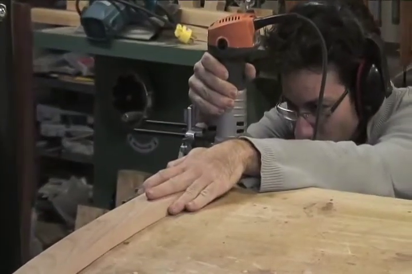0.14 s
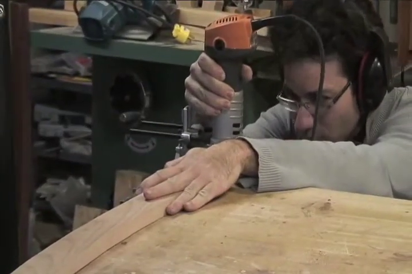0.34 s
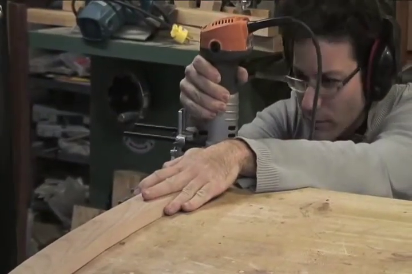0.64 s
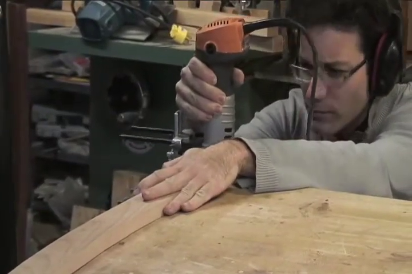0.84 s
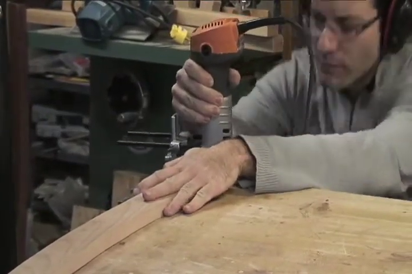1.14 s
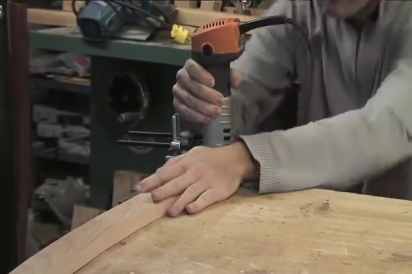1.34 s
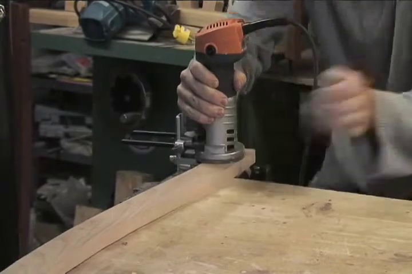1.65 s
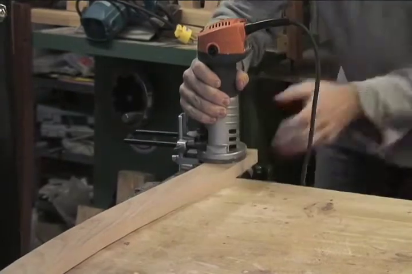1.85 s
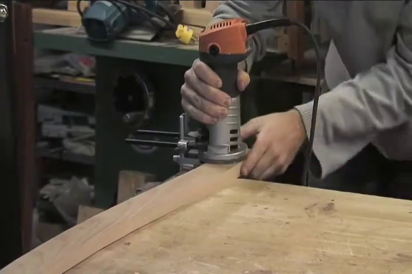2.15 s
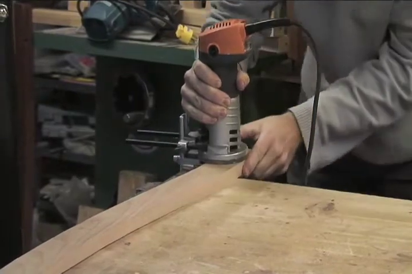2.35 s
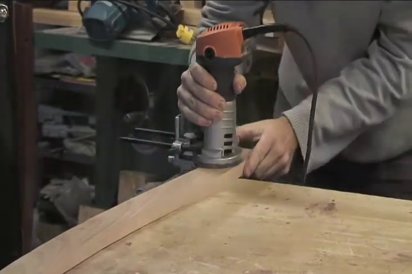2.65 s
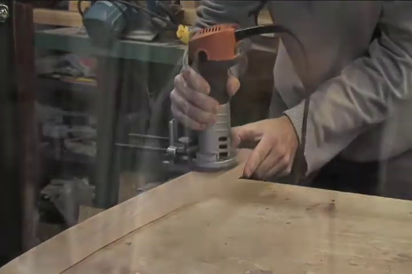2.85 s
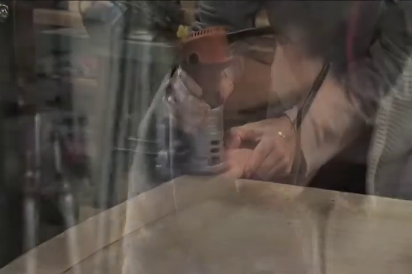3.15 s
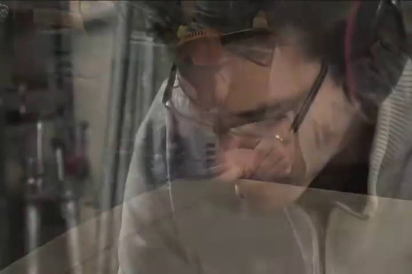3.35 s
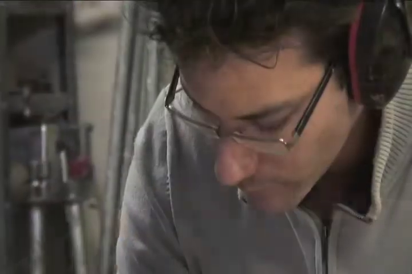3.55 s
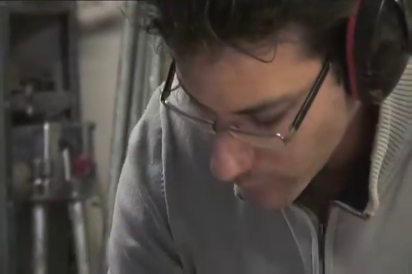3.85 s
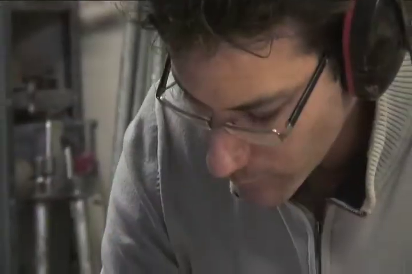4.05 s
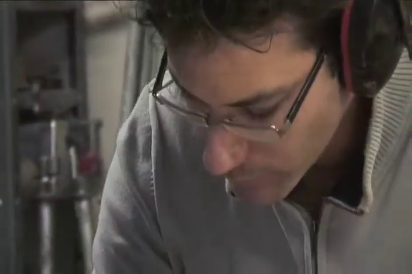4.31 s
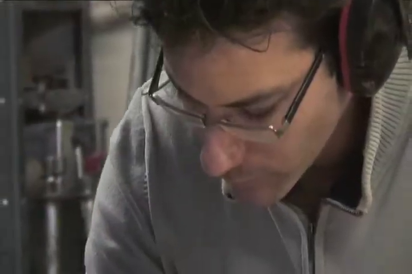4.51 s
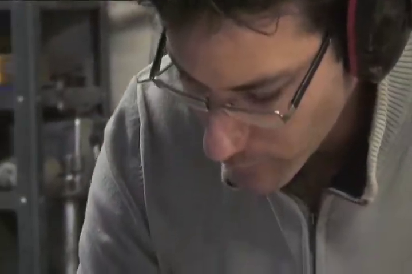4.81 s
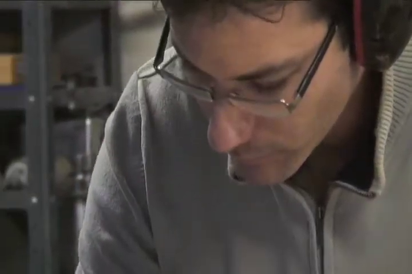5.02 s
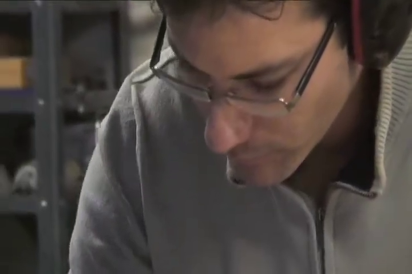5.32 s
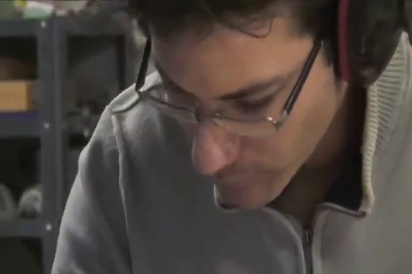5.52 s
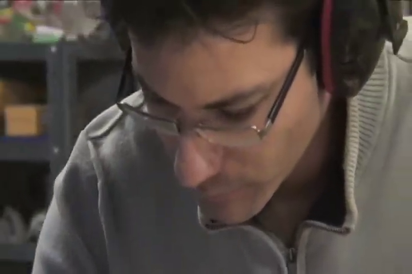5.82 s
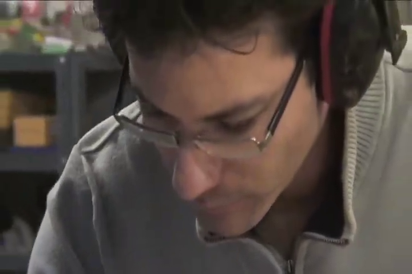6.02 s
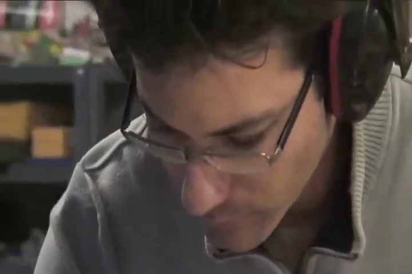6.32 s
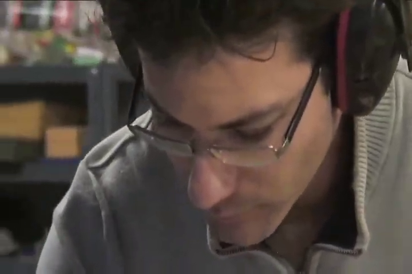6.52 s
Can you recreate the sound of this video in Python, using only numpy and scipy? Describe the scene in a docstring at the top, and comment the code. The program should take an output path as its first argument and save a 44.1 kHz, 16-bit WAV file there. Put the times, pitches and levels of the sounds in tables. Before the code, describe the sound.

A small, fast electric router motor whines continuously, with slightly fluttering overtones and a rush of cooling air. It starts in a light cut, then after a small tick and sudden pitch change it works harder: speed drops a touch, the buzz thickens and the hiss of flying chips rises. Close mono pickup in a workshop, no pauses, still running at the end.

```python
"""The whine of a handheld router in a workshop, at about 29 000 rpm: sines on multiples of its shaft speed.
Behind it, shaped noise gives the rush of cooling air and chips, partly ringing in the housing,
and two sines give a faint motor hum. At 3.14 s the pitch jumps with a faint tick; then the bit bites deeper,
the speed sags and the cutter's orders and the hiss grow. One microphone feeds both channels."""
import sys
import numpy as np
from scipy import signal
from scipy.io import wavfile
from scipy.ndimage import uniform_filter1d

SR = 44100
rng = np.random.default_rng(int(sys.argv[2]) if len(sys.argv) > 2 else 0)


def gain_from_db(level_db):
    """Turn a decibel level (scalar or array-like) into a linear amplitude factor."""
    decades = np.asarray(level_db, float) / 20
    return 10 ** decades


def log_audio(samples):
    """Write samples as a 16-bit WAV file to the path given in sys.argv[1]."""
    # one column per channel
    frames = np.atleast_2d(samples).T
    # limit to full scale, then quantise
    limited = np.clip(frames, -1, 1)
    pcm = np.round(limited * 32767).astype(np.int16)
    wavfile.write(sys.argv[1], SR, pcm)


N = 294147  # samples, 6.67 s
JUMP_S = 3.1435  # pitch and phase jump at once
GRIP_S = 4.84  # the hands shift and damp the housing elsewhere

# Magnetic hum of the motor at twice the mains.
# Each row: time in seconds, level at 120 Hz in dB, level at 240 Hz in dB.
MOTOR_HUM = [(0, -90, -86), (1.1, -76, -88), (1.2, -77.5, -72.5), (2.4, -73.5, -79), (2.6, -77, -91),
             (3.4, -98, -86), (3.9, -70, -91), (5.5, -72, -78), (6.4, -74, -78), (6.67, -89, -87)]

# Spectrum of the cooling air, and how the hiss of chips lifts it.
# Each row: frequency in Hz, relative density in a light cut in dB per Hz, extra in a deep cut in dB.
AIR_SPECTRUM = [(30, -43, 1), (90, -26, -1), (224, -30, 7.5), (380, -12.5, -1), (633, -9.5, 6), (890, 1, 4),
                (2180, 0, -0.1), (2960, -4.5, 3), (4530, -3.5, 3.5), (5220, -9.5, 4.5), (6100, -6, 3),
                (7740, -12.5, 3), (9700, -13, 7), (10500, -17.5, 7), (11270, -14.5, 7.5), (12500, -22, 7),
                (15500, -26.5, 4)]

# Broad modes of the plastic housing and base plate.
# Each row: frequency in Hz, width in Hz, relative level in dB, change in dB once the grip shifts.
HOUSING_MODES = [(727, 79, -7, -28), (825.3, 49, 4, 8), (1087, 47, 2, 6), (1190, 65, -12.5, -7),
                 (1258, 95, 0, 7), (1820, 100, -24, .1), (1898, 73, -4, 13), (4260, 690, -13.5, 15)]

# How hard the tool works.
# Each row: time in seconds, depth of cut 0-1, unsteadiness of the feed 0-1, housing ring in dB.
CUT_LOAD = [(0, 0, 0.1, -37.5), (.6, 0.06, 0.22, -36.5), (1.2, 0.05, 0, -39), (1.75, 0.19, 0, -38),
            (2.3, 0.24, 0.2, -36), (2.7, 0.22, 0.7, -35), (3.14, 0.17, 0.4, -34.5), (3.2, 0.46, .25, -38.5),
            (3.35, 0.87, .3, -37), (3.7, 0.91, 0.07, -39), (4.5, 0.95, .08, -39), (4.9, .8, 0, -44),
            (5.6, 0.95, 0.2, -50.5), (6.0, .9, 0.08, -50), (6.35, 0.85, 0.11, -61), (6.45, 0.48, 0.03, -61),
            (6.67, 0.35, 0.06, -58)]

# The spindle before its hunting is added.
# Each row: time in seconds, shaft speed in Hz, level of the once-a-turn unbalance tone in dB.
SHAFT_SPEED = [(0, 481.2, -38.5), (.22, 480.5, -38), (.36, 481, -38.5), (.8, 484, -38), (1.1, 482.5, -40.5),
               (1.45, 484.2, -39), (1.75, 484.4, -43.5), (2, 486.3, -41.5), (2.28, 484.7, -41.5),
               (2.42, 482.5, -46), (2.72, 480.7, -44.5), (2.88, 486, -44.5), (3.02, 484.3, -42),
               (3.143, 481, -50), (3.145, 487.7, -45), (3.2, 487.8, -44), (3.29, 480.3, -46),
               (3.36, 473.9, -38), (3.5, 471, -30.5), (3.78, 464.6, -31.5), (3.98, 466.9, -28.5),
               (4.28, 467, -25.5), (4.5, 463.3, -28), (4.7, 464.4, -27.5), (4.95, 468.6, -28),
               (5.18, 474, -29.5), (5.4, 473.3, -28), (5.72, 469, -30.5), (5.86, 470.7, -32),
               (6.06, 466.5, -31), (6.2, 468.4, -31), (6.3, 465.8, -30.5), (6.42, 468.7, -31),
               (6.67, 481.6, -34.5)]

# The main orders: two flutes give 2, fan blades 7, commutator 14.
# Each row: order as a multiple of shaft speed, base level in a light cut in dB, in a deep cut in dB.
MAIN_ORDERS = [(2, -51.5, -29), (3, -37, -45), (4, -47, -30.5), (5, -58, -38), (6, -58, -30), (7, -36, -50),
               (8, -58, -38.5), (9, -59.5, -39), (10, -59.5, -38.5), (11, -51.5, -49.5), (12, -54, -42.5),
               (13, -58, -45.5), (14, -49, -44.5)]

# Single orders swell or fade for a moment as the tool moves among its reflections.
# Each row: centre in seconds, order, length in seconds, change at the centre in dB.
ORDER_SWELLS = [(0.04, 2, 0.19, 8.5), (0.05, 6, 0.13, 16), (0.06, 14, 0.27, 10.5), (0.07, 8, 0.17, 16),
                (0.078, 10, 0.18, 11), (0.09, 4, 0.55, 17.5), (0.15, 3, 0.2, 2), (0.155, 4, 0.13, -11.5),
                (0.17, 7, 0.67, -4.5), (0.24, 5, 1.7, 13.0), (0.255, 3, 0.33, 6), (0.394, 2, 1.43, 18),
                (0.487, 14, 0.14, 7), (0.686, 7, 0.16, -6.5), (0.78, 5, 0.15, -14.0),
                (0.96, 11, 0.44, -10.5), (1.03, 3, 0.99, -11), (1.03, 4, 0.73, -3), (1.111, 7, 0.21, -12.5),
                (1.152, 14, 0.18, -11), (1.23, 6, 0.14, 13), (1.4, 11, 1.1, 6), (1.56, 4, 0.17, -3),
                (1.66, 14, 0.27, -14), (1.81, 7, 0.4, -8), (1.89, 3, 0.2, 6.5), (1.93, 12, 0.88, 4.5),
                (2.047, 6, 0.17, 7.5), (2.06, 9, 0.17, 8), (2.18, 4, 0.15, -14), (2.284, 7, 0.25, -6),
                (2.32, 11, 0.62, 7), (2.342, 14, 0.13, -9.5), (2.377, 6, 0.26, 7), (2.407, 2, 0.16, 6),
                (2.45, 9, 0.21, 19.5), (2.53, 3, 0.17, -21), (2.681, 12, 0.78, -3), (2.75, 8, 0.49, -1),
                (2.76, 7, 0.094, -14), (2.92, 2, 0.43, 6), (3.0, 3, 0.25, 2), (3.1, 7, 0.34, -14.5),
                (3.184, 3, 0.13, -13), (3.18, 9, 0.1, 11), (3.186, 5, 0.1, 13), (3.185, 14, 0.091, 9),
                (3.204, 7, 0.4, 17.5), (3.245, 10, 0.13, 5), (3.28, 3, 0.058, 2.5), (3.3, 8, 0.05, 10),
                (3.327, 2, 0.076, -8), (3.334, 12, 0.12, -18), (3.355, 4, 0.24, -8.5), (3.39, 4, 0.67, 10),
                (3.4, 7, 0.088, -10), (3.466, 2, 0.27, 6.5), (3.56, 14, 0.31, 9), (3.57, 5, 0.23, -9),
                (3.61, 3, 1.07, 15), (3.76, 7, 0.49, 9), (3.798, 6, 0.31, 6.5), (3.99, 12, 0.57, 14),
                (4.1, 12, 0.29, -27), (4.12, 10, 0.37, 7), (4.31, 4, 0.22, -10), (4.379, 5, 0.1, -10),
                (4.39, 14, 1.046, 12.5), (4.487, 3, 0.96, 11), (4.585, 14, 0.24, -14),
                (4.774, 7, 0.16, 9.5), (4.778, 9, 0.076, -16.0), (4.826, 5, 0.12, -12.5),
                (4.85, 2, 0.13, -11), (4.942, 4, 0.046, -5), (4.966, 14, 0.3, 4.5), (4.988, 8, 0.21, 4.5),
                (5.12, 2, 0.41, 2), (5.135, 4, 0.088, -11), (5.16, 10, 0.45, -7.5), (5.19, 11, 0.35, -13),
                (5.27, 3, 0.5, 6.5), (5.274, 6, 0.34, -14), (5.48, 11, 1.25, 7), (5.55, 12, 0.17, -10),
                (5.574, 8, 0.55, 5.5), (5.65, 9, 0.44, 4.5), (5.704, 7, 0.4, 12.5), (5.72, 6, 0.2, -6.5),
                (5.75, 2, 0.26, -14), (5.793, 5, 0.13, -21), (5.79, 10, 0.17, -17), (5.835, 14, 0.1, 13),
                (5.85, 4, 0.38, 16.5), (5.977, 6, 0.067, 6.5), (6.017, 4, 0.62, -13.5),
                (6.084, 9, 0.16, -8), (6.099, 6, 0.13, -0.5), (6.13, 12, 0.18, -4), (6.27, 6, 0.14, 3),
                (6.293, 7, 0.5, 11.5), (6.45, 2, 0.14, 9.5), (6.46, 8, 0.16, 8.5), (6.472, 10, 0.29, 10.5),
                (6.496, 3, 0.099, 6.0), (6.51, 13, 0.23, 7), (6.554, 14, 0.32, 11), (6.67, 6, 0.67, 16.5)]

# The faint top orders, which fade in and out by chance.
# Each row: order, base level in a light cut in dB, base level in a deep cut in dB.
TOP_ORDERS = [(15, -60, -57), (16, -60, -54), (17, -61, -54), (18, -61, -54), (19, -66, -57),
              (20, -63, -58), (21, -62, -57), (22, -69, -62), (23, -61, -61), (24, -63, -60),
              (25, -63, -61), (26, -68, -70), (27, -69, -66), (28, -70, -70), (29, -72, -72),
              (30, -74, -74), (31, -74, -75)]


def evened(x):
    """Scales a signal to rms 1."""
    return x / np.sqrt(np.mean(abs(x) ** 2) + 1e-20)


def curves(rows, t):
    """Reads every column of a table at the times t, gliding in straight lines between rows."""
    s, *columns = np.transpose(rows)
    return [np.interp(t, s, c) for c in columns]


def drift(rate_hz):
    """Slow complex chance of rms 1: low-passed noise changing about rate_hz times a second."""
    step, settle = 32, 1998  # samples per point; points dropped while the filter settles
    points = N // step + 2000
    noise = rng.standard_normal(points) + 1j * rng.standard_normal(points)
    b, a = signal.butter(2, rate_hz, fs=SR / step)
    slow = evened(signal.lfilter(b, a, noise)[settle:])
    return np.interp(np.arange(N) / step, np.arange(len(slow)), slow)


def hum():
    """The field coils pull twice in each mains cycle: a tone at 120 Hz and its octave."""
    t = np.arange(N) / SR
    low_db, high_db = curves(MOTOR_HUM, t)
    low = gain_from_db(low_db) * np.sin(2 * np.pi * 120 * t)
    high = gain_from_db(high_db) * np.sin(2 * np.pi * 240 * t)
    return np.sqrt(2) * (low + high)


def tick():
    """A faint tick at the pitch jump: one smooth pulse under a millisecond wide."""
    t = np.arange(N) / SR
    return gain_from_db(-51) * np.exp(-.5 * ((t - JUMP_S) / 0.00036) ** 2)


def air_spectrum(hz, depth):
    """Turbulent cooling air and flying chips: noise amplitude per bin and frame, rising with the cut."""
    f, light_db, extra_db = np.transpose(AIR_SPECTRUM)
    light_db = np.interp(np.log(hz + 1), np.log(f), light_db)[:, None]
    extra_db = np.interp(np.log(hz + 1), np.log(f), extra_db)[:, None]
    air = gain_from_db(light_db + extra_db * depth - 35.5)
    return air / np.sqrt(np.mean(gain_from_db(light_db) ** 2))


def housing_power(hz, t, ring_db):
    """The housing resonates in broad modes, whose balance changes as the grip shifts."""
    shifted = np.clip((t - GRIP_S) / .2, 0, 1)
    ring = 0
    for f, width_hz, db, change_db in HOUSING_MODES:
        peak = 1 / (1 + (2 * (hz[:, None] - f) / width_hz) ** 2) ** 2
        ring = ring + gain_from_db(2 * (db + change_db * shifted)) * peak
    return ring / ring[:, 0].mean() * gain_from_db(2 * ring_db)


def rush():
    """Air, chips and housing ring as shaped noise, combed by reflections that shift slowly."""
    hop, size = 512, 2048  # samples
    frames, hz = N // hop + 5, np.fft.rfftfreq(size, 1 / SR)
    t = np.arange(frames) * hop / SR
    depth, _, ring_db = curves(CUT_LOAD, t)
    shape = np.sqrt(air_spectrum(hz, depth) ** 2 + housing_power(hz, t, ring_db))
    a, b, comb, patches = rng.standard_normal((frames, len(hz), 4)).T
    noise = a + 1j * b
    # the comb is fine in pitch and slow; the patches are broad in pitch and quick
    comb = evened(uniform_filter1d(uniform_filter1d(comb, size=4, axis=0), size=60, axis=1))
    patches = evened(uniform_filter1d(uniform_filter1d(patches, size=30, axis=0), size=6, axis=1))
    comb_db = 2.64 * comb / (1 + hz[:, None] / 6000)  # the combing blurs in the treble
    shaped = noise * shape * gain_from_db(comb_db + 0.93 * patches)
    unit = np.std(signal.istft(noise, nperseg=size, noverlap=size - hop)[1])  # the noise before shaping
    return signal.istft(shaped, nperseg=size, noverlap=size - hop)[1][:N] / unit


def shaft_angle():
    """The angle of the spindle in radians, whose speed hunts a little as the grain changes."""
    t = np.arange(N) / SR
    speed_hz = curves(SHAFT_SPEED, t)[0] + 0.381 * drift(23.5).real
    phase_jump = rng.uniform(0.328, 0.659) * (t > JUMP_S)
    return 2 * np.pi * (np.cumsum(speed_hz) / SR + phase_jump)


def order_levels(t, depth):
    """Level in dB of the unbalance tone, then of each main order: it follows the cut, wavers and swells."""
    yield 1, curves(SHAFT_SPEED, t)[1]
    for k, light_db, deep_db in MAIN_ORDERS:
        db = light_db + depth * (deep_db - light_db)
        db = db + (1.86 + 0.1032 * k) * drift(6.8).real  # the high orders waver more
        for s, which, length, change_db in ORDER_SWELLS:
            if which == k:
                db = db + change_db * np.exp(-(2 * (t - s) / length) ** 2)
        yield k, db


def whine(angle):
    """Every turn repeats the same knock: sines on whole multiples of the shaft speed, loosely in step."""
    t = np.arange(N) / SR
    depth, unsteady, _ = curves(CUT_LOAD, t)
    out = np.zeros(N)
    for k, db in order_levels(t, depth):
        chatter = (0.024 + 0.016 * k) * drift(23)  # uneven chips blur each line, the high ones more
        flutter = unsteady * (0.68 + 0.036 * k) * drift(12.8)  # the hand feeds the bit in small jerks
        lag = 1.64 * drift(0.77).real  # reflections let the orders slide in and out of step
        tone = np.exp(1j * (k * angle + lag)) * (1 + chatter + flutter)
        out += gain_from_db(db) * tone.real
    for k, light_db, deep_db in TOP_ORDERS:
        paths = .6 + .7 * drift(4) + .3 * drift(40)  # direct sound and moving reflections beat
        tone = np.exp(1j * k * angle) * paths
        out += gain_from_db(light_db + depth * (deep_db - light_db)) * tone.real
    return np.sqrt(2) * out


def scene():
    """Mixes whine, rush, hum and tick; the rush throbs once a turn; both channels are alike."""
    angle = shaft_angle()
    throb = 1 + 0.04 * np.cos(angle)
    mix = whine(angle) + throb * rush() + hum() + tick()
    return np.tile(mix, (2, 1))


def roll_off(x):
    """The treble ends steeply here."""
    return signal.sosfilt(signal.butter(12, 15750, fs=SR, output="sos"), x)


def record(dry):
    """Delivers the finished mix."""
    return roll_off(dry)


dry = scene()
out = record(dry)
log_audio(out)
```